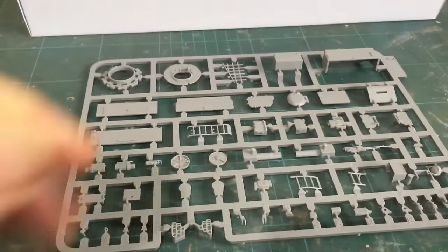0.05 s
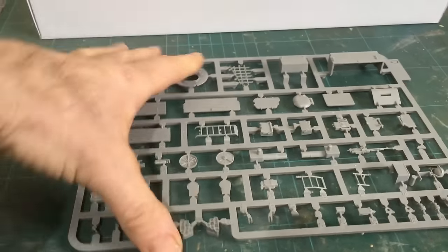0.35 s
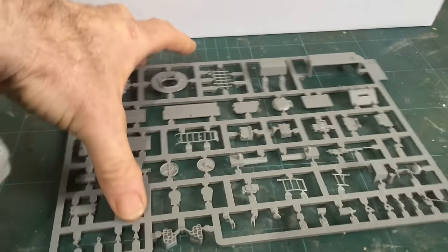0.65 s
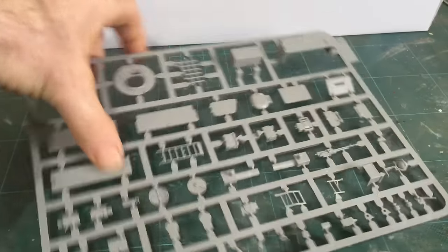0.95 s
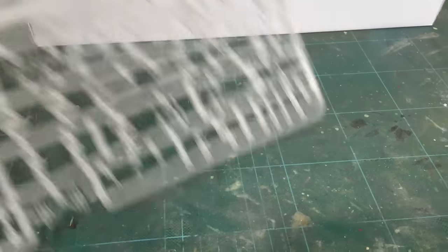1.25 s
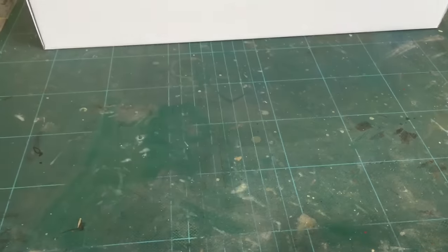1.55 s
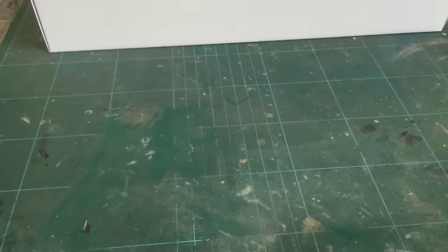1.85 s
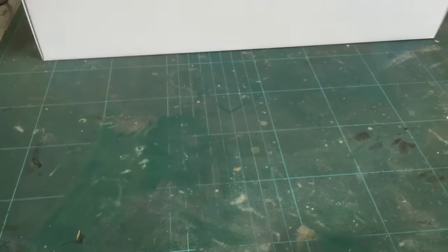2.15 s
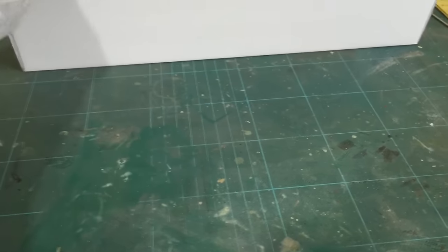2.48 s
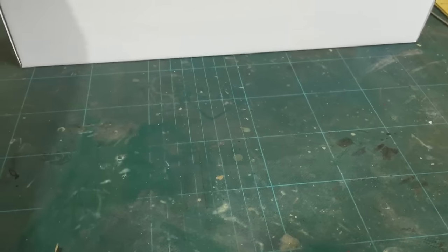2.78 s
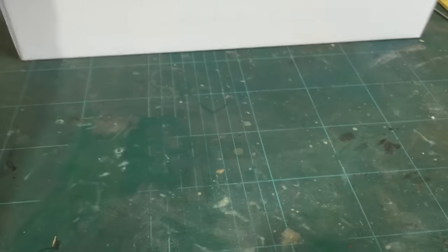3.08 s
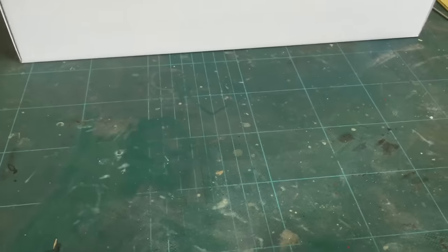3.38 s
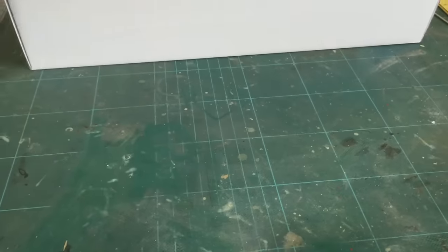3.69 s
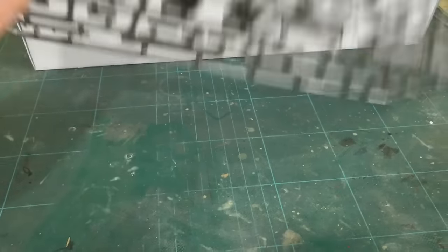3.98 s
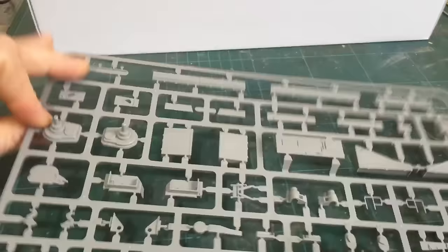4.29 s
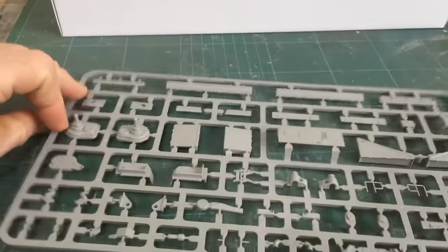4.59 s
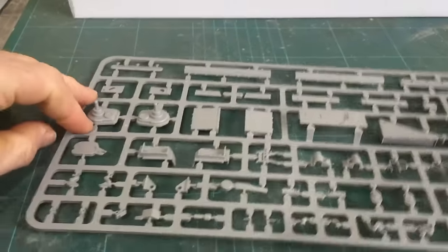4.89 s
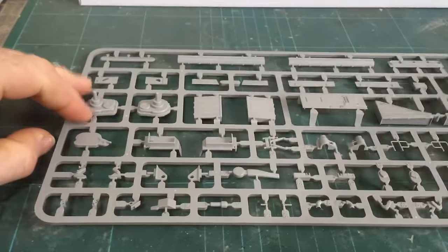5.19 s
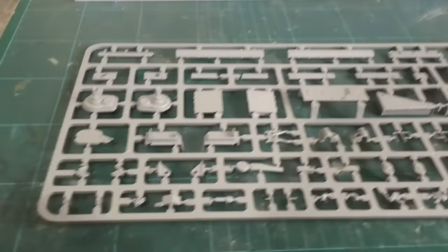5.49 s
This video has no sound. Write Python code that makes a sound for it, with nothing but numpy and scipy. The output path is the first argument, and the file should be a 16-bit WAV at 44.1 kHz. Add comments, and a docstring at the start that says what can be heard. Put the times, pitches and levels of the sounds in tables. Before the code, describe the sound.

Plastic model-kit frames are handled close by in a small room with short reverberation and faint steady room tone. From about 0.4 seconds one frame slides softly across a cutting mat in uneven pushes with a few ticks, and a sleeve brushes faintly near 1.3 seconds. From 1.8 to 2.5 seconds the frame is laid aside with a crackly rustle, light rattles and sharp, bright snaps. Between 2.6 and 3.6 seconds comes the loudest part: another frame scrapes out of a cardboard box in several pulls, with dull knocks and small snags. A few light clicks follow near 3.8 seconds. From 4.1 to 4.8 seconds the frame clatters down on the mat in a run of light plastic taps, one small part pinging briefly at 4.5 seconds. Short slides and a last soft tap nudge it straight, ending around 5.4 seconds.

```python
"""A cutting mat in a small room, where plastic model-kit sprues are swapped by hand.
One frame is dragged off the mat and laid aside with a rustle; the next is scraped out of its cardboard
box, clatters down on the mat and is nudged straight. Stick-slip friction excites plastic, cardboard and
a sleeve; impacts set the frames rattling and the box thudding; thin edges snap and small parts ring.
Diffuse reverberation follows each sound, over a steady room tone."""
import sys
import numpy as np
from scipy import signal
from scipy.fft import rfft, irfft
from scipy.io import wavfile

SR = 44100
rng = np.random.default_rng(int(sys.argv[2]) if len(sys.argv) > 2 else 0)


def digitize_waveform(pressure):
    """Quantize a signal to 16-bit integers and store it at the path in sys.argv[1].

    Rows of a 2-D input are taken as channels; values are limited to [-1, 1].
    """
    field = np.atleast_2d(pressure).T
    bounded = np.clip(field, -1, 1)
    quanta = np.round(bounded * 32767).astype(np.int16)
    wavfile.write(sys.argv[1], SR, quanta)


N = 244314
RING = 2 ** 14  # samples in an impulse response
T = np.arange(N) / SR
# normal modes of a plastic frame: f/Hz, bandwidth/Hz, lift/dB
FRAME_MODES = [(1069, 63, 4), (1040, 56, 0.5), (1152, 70, 2.5), (1330, 26, 3.5), (1580, 120, 1),
               (1860, 83, 1), (2240, 23, -5), (3010, 110, -1), (3290, 16, 0.5), (4220, 67, 5),
               (4800, 20, -9), (5320, 25, 5.5), (5750, 39, 7), (6500, 56, 5.5), (7260, 45, 1),
               (7000, 78, 3)]


def from_db(db):
    """Amplitude ratio of a level in decibels."""
    return 10 ** (np.asarray(db) / 20)


def unit_energy(x):
    """Energy normalisation: such a response leaves the power of white noise unchanged."""
    return x / np.sqrt(np.sum(x ** 2) + 1e-20)


def at_hz(points, hz):
    """Interpolation on a logarithmic frequency axis."""
    f, value = np.transpose(points)
    return np.interp(np.log(np.maximum(hz, 1)), np.log(f), value)


def band(x, low_hz, high_hz, order=4):
    """Causal band-pass filtering."""
    sections = signal.butter(order, [low_hz, min(high_hz, SR / 2 - 1)], "band", fs=SR, output="sos")
    return signal.sosfilt(sections, x + 1e-18)


def resonate(x, hz, width_hz):
    """Forced response of a damped oscillator with unit peak gain."""
    r = np.exp(-np.pi * width_hz / SR)
    feedback = [1, -2 * r * np.cos(2 * np.pi * hz / SR), r * r]
    return signal.lfilter(np.array([1, 0, -1]) * (1 - r * r) / 2, feedback, x + 1e-18)


def body(spectrum, modes=()):
    """Modal superposition: an impulse response made of a minimum-phase click and its resonances."""
    cepstrum = irfft(np.log(from_db(at_hz(spectrum, np.fft.rfftfreq(RING, 1 / SR)))))
    cepstrum[1:RING // 2] *= 2  # folding the cepstrum makes the click causal
    cepstrum[RING // 2 + 1:] = 0
    tap = irfft(np.exp(rfft(cepstrum)))
    return tap + sum((from_db(db) - 1) * resonate(tap, hz, width) for hz, width, db in modes)


def in_room(x, wet_db, build_s=0.0012):
    """Reverberation: direct sound, then a diffuse field that decays exponentially in each band."""
    # reverberation times: f/Hz, t60/s
    decay_times = [(150, 0.49), (550, 0.22), (1400, 0.18), (4000, 0.23), (14000, 0.14)]
    t, edges = T[:RING], np.geomspace(60, 18000, 9)
    tail = np.zeros(RING)
    for low, high in zip(edges, edges[1:]):
        t60 = at_hz(decay_times, np.sqrt(low * high))
        tail += band(rng.standard_normal(RING), low, high) * from_db(-60 * t / t60)
    diffuse = from_db(wet_db) * unit_energy(tail * (1 - np.exp(-t / build_s)))
    return signal.fftconvolve(x, unit_energy((t == 0) + diffuse))[:N]


def radiate(force, response, low_hz, high_hz):
    """Convolution of a force with one band of an impulse response, normalised to unit energy."""
    return signal.fftconvolve(force, unit_energy(band(response, low_hz, high_hz)))[:N]


def slips(per_s, spread_db, size=N):
    """Shot noise of rms 1: tiny random catches, mostly small, a few large."""
    sizes = from_db(spread_db * np.minimum(rng.exponential(1, size), 4)) * rng.choice([-1, 1], size)
    return unit_energy(sizes * (rng.random(size) < per_s / SR)) * np.sqrt(size)


def stroke_gains(strokes, speed_exponent=1.31, hiss_exponent=1.2):
    """Friction noise grows with sliding speed, hiss faster than body sound; strokes add in power."""
    body_power, hiss_power = np.zeros(N), np.zeros(N)
    for start, rise, hold, fade, body_db, hiss_db in strokes:
        slowing = from_db(-20 * np.clip((T - start - rise - hold) / fade, 0, 10))
        speed = np.clip((T - start) / rise, 0, 1) ** speed_exponent * slowing
        body_power += (from_db(body_db) * speed) ** 2
        hiss_power += (from_db(hiss_db) * speed ** hiss_exponent) ** 2
    return np.sqrt(body_power), np.sqrt(hiss_power)


def rub(gains, tap, per_s, spread_db, jerk_db, body_db, hiss_db, wet_db, jerks_per_s=90):
    """Stick-slip friction: a stream of slips under a wavering grip shakes a body and hisses."""
    body_gain, hiss_gain = gains
    grip = np.interp(T * jerks_per_s, np.arange(2000), rng.standard_normal(2000))
    force = unit_energy(slips(per_s, spread_db) * from_db(jerk_db * grip)) * np.sqrt(N)
    response = in_room(tap, wet_db)
    body_sound = radiate(force * body_gain * from_db(body_db), response, 70, 2000)
    hiss = radiate(force * hiss_gain * from_db(hiss_db), response, 2000, 18000)
    return body_sound + hiss


def room_tone(level_db=-66):
    """Stationary coloured noise: a low murmur with a faint hiss."""
    # background spectrum: f/Hz, relative level/dB
    spectrum = [(15, -60), (25, -35.5), (117, 3), (166, -8), (236, -0.5), (285, -8), (384, -4), (476, -8.5),
                (1400, -12.5), (2550, -12), (5730, -16), (10100, -17), (16000, -20.5)]
    noise = irfft(rfft(rng.standard_normal(N)) * from_db(at_hz(spectrum, np.fft.rfftfreq(N, 1 / SR))), N)
    return from_db(level_db) * unit_energy(noise) * np.sqrt(N)


def sleeve_brush():
    """Cloth friction: dense slips merge into broadband noise as the arm reaches in and swings away."""
    # arm swings: t/s, rise/s, hold/s, fade/s, relative body level/dB, relative hiss level/dB
    swings = [(0.2, 0.18, 0.032, 0.39, -70, -65.5), (1.3, 0.082, 0.018, 0.3, -68, -56)]
    # cloth spectrum: f/Hz, relative level/dB
    spectrum = [(60, -19), (130, -1), (300, 5.5), (600, -1), (3500, -5), (5000, -2), (7500, 2.5),
                (11000, -0.5), (16000, -4)]
    return rub(stroke_gains(swings), body(spectrum),
               per_s=15000, spread_db=5.0, jerk_db=1.5, body_db=1, hiss_db=-0.5, wet_db=-15)


def mat_slide():
    """Forced vibration: friction against the mat drives the modes of a frame."""
    # slides: t/s, rise/s, hold/s, fade/s, relative body level/dB, relative hiss level/dB
    slides = [(0.42, 0.056, .015, 0.26, -57.5, -61.5), (0.545, 0.039, 0.013, 0.4, -57, -60),
              (0.725, 0.026, .025, 0.25, -54.5, -60), (0.935, 0.0055, 0.034, 0.15, -55.5, -57),
              (1.0, 0.09, 0.026, 0.18, -52, -52.5), (1.2, 0.093, 0.011, 0.031, -54.5, -48),
              (4.54, .02, 0.017, 0.56, -58, -59.5), (4.75, 0.019, 0.011, 0.033, -54, -41.5),
              (4.81, 0.021, 0.03, 0.068, -48.5, -48.5), (5.06, 0.034, 0.0078, 0.21, -65.5, -66),
              (5.19, 0.095, 0.067, 0.1, -55.5, -55)]
    # spectrum of plastic on the mat: f/Hz, relative level/dB
    spectrum = [(41, -77), (70, -34), (124, -5), (286, -7.5), (336, -5), (566, -2), (779, -1.5), (1070, 3),
                (1200, -2), (2430, -16), (2660, -15.5), (3570, -18), (6160, -21.5), (13000, -20),
                (16000, -31.5)]
    return rub(stroke_gains(slides), body(spectrum, FRAME_MODES),
               per_s=7000, spread_db=2.0, jerk_db=3.5, body_db=-1.5, hiss_db=-2.5, wet_db=-8)


def edge_snaps(t60=0.014):
    """Sudden release of elastic energy: an edge springs free with a brief, bright crack."""
    # edges snapping past each other: t/s, dry peak level/dB, lower cutoff f/Hz
    snaps = [(0.4765, -45, 600), (1.0425, -45, 3200), (1.8425, -26.5, 5500), (1.9022, -36, 7000),
             (1.9497, -35, 10000), (2.026, -38, 9500), (2.0535, -37, 8500), (3.0372, -38, 5000),
             (3.3467, -30, 2500), (3.3615, -30, 8000), (4.1957, -38, 700), (4.2405, -37, 2000),
             (4.9408, -38, 3000)]
    out = np.zeros(N + RING)
    for start, peak_db, low_hz in snaps:
        burst = rng.standard_normal(RING) * from_db(-60 * T[:RING] / t60)
        crack = band(burst, low_hz, 15000, order=2)
        i = round(start * SR)
        out[i:i + RING] += from_db(peak_db) * crack / np.abs(crack).max()
    return in_room(out, wet_db=-8)


def frame_clatter(crack=0.58, hard_s=0.00098, reflection=0.26, parts_db=-0.25, gain_db=2):
    """Impact excitation: each contact is a crack, then a dying rattle of the frame's corners and parts."""
    # a frame lands or catches: t/s, rise/s, rattle t60/s, relative level/dB, brightness/dB
    contacts = [(0.477, 0.0016, 0.16, -62, -4.5), (1.773, 0.0017, 0.17, -58.5, 8.5),
                (1.841, .001, 0.21, -53.5, 10), (2.027, 0.0012, .17, -55.5, 8.5),
                (2.123, 0.00015, .13, -56.5, 0.5), (2.315, .001, 0.063, -63.5, 3),
                (3.038, .004, .06, -55, -3), (3.087, 0.0087, 0.076, -55.5, 1),
                (3.162, 0.0057, 0.21, -49, 5.5), (3.345, 0.0046, .05, -52, -1),
                (3.684, 0.0015, 0.034, -64.5, -1.5), (3.86, 0.0031, 0.11, -58, 2),
                (4.131, 0.014, 0.088, -51, 0), (4.196, 0.0018, 0.023, -56, -5),
                (4.24, 0.0024, 0.16, -56.5, 0.5), (4.274, 0.005, 0.068, -42.5, 1.5),
                (4.369, 0.0022, .1, -50.5, 0), (4.45, 0.0011, 0.073, -60, -1),
                (4.492, 0.0031, 0.086, -43.5, -0.5), (4.533, .009, 0.11, -54, 1),
                (4.707, 0.0023, 0.2, -47.5, 2.5), (4.743, 0, 0.17, -43.5, -3), (4.942, 0, 0.014, -57.5, -5),
                (5.194, 0.0045, 0.12, -53.5, -4)]
    # spectrum of a struck frame: f/Hz, relative level/dB
    spectrum = [(47, -18), (80, -12), (112, -8.5), (248, -4.5), (296, -9), (422, -3), (896, 0), (1050, 5),
                (2080, -13.5), (4230, -10), (6740, -15.5), (9610, -12.5), (10700, -13), (12300, -8.5),
                (16000, -19.5)]
    edges_hz = [90, 2000, 7000, 18000]  # three bands: frame, small parts, tick
    t, forces = T[:RING], np.zeros((3, N + RING))
    for start, rise, t60, db, bright_db in contacts:
        attack = np.minimum((t + 1 / SR) / (rise + 1 / SR), 1)
        decay = from_db(-60 * np.maximum(t - rise, 0) / t60)
        force = unit_energy(slips(per_s=5000, spread_db=3.0, size=RING) * attack * decay)
        force[0] += crack * np.exp(-rise / hard_s)  # a square hit cracks; a glancing one swells
        force += reflection * rng.choice([-1, 1]) * np.roll(force, rng.integers(5, 30))  # far-edge echo
        onset = int((0.025 + rise / 2) * SR)
        force /= np.sqrt(np.mean(force[:onset] ** 2))
        i = round(start * SR)
        forces[:, i:i + RING] += from_db([[db - bright_db], [db + parts_db], [db + bright_db]]) * force
    response = in_room(body(spectrum, FRAME_MODES), wet_db=-2)
    bands = zip(forces, edges_hz, edges_hz[1:])
    return from_db(gain_db) * sum(radiate(force, response, low, high) for force, low, high in bands)


def part_pings(overtone_ratio=2.34, overtone_db=-12, detune=0.06):
    """Free vibration: a flicked part rings in a cluster of close modes, with a weaker cluster above."""
    # parts flicked on their stalks: t/s, dry peak level/dB, f/Hz, t60/s
    flicks = [(0.719, -50.5, 2850, 0.016), (1.042, -37.5, 3750, 0.01), (3.842, -50.5, 3660, 0.019),
              (3.862, -38.5, 5550, 0.084), (3.864, -42.5, 3920, .09), (4.4923, -29.5, 5140, 0.056)]
    t, out = T[:RING], np.zeros(N + RING)
    for start, peak_db, hz, t60 in flicks:
        cluster_hz = hz * (1 + detune * (np.linspace(-1, 1, 5) + 0.2 * rng.standard_normal(5)))[:, None]
        phase = 2 * np.pi * (cluster_hz * t + rng.random(cluster_hz.shape))
        modes = np.sin(phase) + from_db(overtone_db) * np.sin(overtone_ratio * phase)
        ring = modes.sum(axis=0) * from_db(-60 * t / t60)
        i = round(start * SR)
        out[i:i + RING] += from_db(peak_db) * ring / np.abs(ring).max()
    return in_room(out, wet_db=-7)


def aside_rustle():
    """Sliding friction: a frame rustles and snags as it is laid aside."""
    # strokes: t/s, rise/s, hold/s, fade/s, relative body level/dB, relative hiss level/dB
    strokes = [(1.768, 0.031, 0.012, 0.16, -51.5, -52.5), (1.835, .01, .24, .13, -59, -52.5),
               (2.11, 0.024, 0.045, 0.094, -51.5, -55), (2.2, .03, 0.014, 0.096, -52, -52.5),
               (2.3, 0.022, 0.031, .1, -51, -59.5), (2.4, 0.019, 0.036, 0.16, -57.5, -66)]
    # rustle spectrum: f/Hz, relative level/dB
    spectrum = [(47, -58), (80, -21), (130, -1), (227, -4.5), (369, -2.5), (413, -4), (527, -6), (588, 1),
                (751, -5.5), (980, -1.5), (1860, -21), (12500, -24), (16000, -27)]
    gains = stroke_gains(strokes)
    rustle = rub(gains, body(spectrum),
                 per_s=5200, spread_db=3.5, jerk_db=3.0, body_db=1, hiss_db=-1.0, wet_db=-6.5)
    return rustle + snag_crackle(gains, per_s=340, gain_db=-5.5)


def snag_crackle(gains, per_s, gain_db):
    """Impulse-driven resonances: thin edges snag and snap free, each with a high pitch of its own."""
    _, hiss_gain = gains
    pitches = np.linspace(5500, 14000, 12)
    snags = sum(resonate(slips(per_s / len(pitches), spread_db=3.5), hz, width_hz=700) for hz in pitches)
    return in_room(unit_energy(snags) * np.sqrt(N) * from_db(gain_db) * hiss_gain, wet_db=-4)


def cardboard_knocks(unevenness=0.1):
    """Heavily damped resonance: a cardboard panel thuds as a frame bumps it or judders along it."""
    # knocks: t/s, dry peak level/dB, judder length/s, bounce rate/Hz, panel f/Hz
    knocks = [(1.7984, -37, .005, 800, 950), (2.176, -34, .012, 450, 650), (2.4277, -33, .014, 480, 600),
              (2.6984, -38, .001, 500, 600), (2.882, -25, .001, 500, 700), (2.956, -27, .007, 650, 850),
              (3.1805, -23.5, .016, 500, 550), (3.6186, -34, .001, 500, 1000), (3.843, -45, .009, 200, 220)]
    out = np.zeros(N + RING)
    for start, peak_db, length, per_s, hz in knocks:
        bounces = np.arange(1 + int(length * per_s))
        jitter = np.clip(unevenness * rng.standard_normal(len(bounces)), -0.5, 0.5) * (bounces > 0)
        times = (bounces + jitter) / per_s
        force = np.zeros(RING)
        force[(times * SR).astype(int)] = 1 - 0.3 * bounces / len(bounces)
        thud = band(resonate(force, hz, width_hz=450), 120, 1300)
        i = round(start * SR)
        out[i:i + RING] += from_db(peak_db) * thud / np.abs(thud).max()
    return in_room(out, wet_db=-10)


def box_scrape():
    """Forced vibration: the next frame scrapes along its box, driving the cardboard's modes, and snags."""
    # pulls: t/s, rise/s, hold/s, fade/s, relative body level/dB, relative hiss level/dB
    pulls = [(2.619, 0.15, 0.036, .1, -49.5, -61), (2.77, 0.074, 0.06, 0.22, -37, -49),
             (3.015, 0.027, .012, 0.1, -38.5, -50), (3.03, 0.14, 0.021, 0.2, -36, -42.5),
             (3.338, 0.026, 0.047, 0.22, -33.5, -42.5), (3.798, .04, 0.013, 0.088, -55, -69)]
    # spectrum of plastic on cardboard: f/Hz, relative level/dB
    spectrum = [(47, -66), (80, -24), (156, -9), (296, -11), (395, -1.5), (515, 2), (615, -6), (877, -3.5),
                (1170, -14), (1950, -23), (2080, -27), (2900, -28.5), (5050, -29.5), (12500, -32),
                (16000, -38)]
    # box resonances: f/Hz, bandwidth/Hz, lift/dB
    modes = [(162.5, 5.8, 2.2), (408, 16, 5.8), (522.7, 7.6, 7.4), (582, 11, 6.3), (668, 37, 7.7),
             (735, 13, 1.4), (869, 41, 9.3), (1060, 25, 5.6), (1265, 28, 4.5), (1896, 42, 5.9),
             (2950, 170, 9.6), (3480, 110, 7.4), (3800, 120, 7.4), (4250, 190, 7.6), (4500, 130, 5),
             (6360, 250, 5.2), (7640, 150, 8.9)]
    gains = stroke_gains(pulls)
    scrape = rub(gains, body(spectrum, modes),
                 per_s=4500, spread_db=3.0, jerk_db=1.5, body_db=0, hiss_db=-1.5, wet_db=-8)
    return scrape + snag_crackle(gains, per_s=870, gain_db=-13.5)


def scene():
    """Linear superposition of all sources in one channel."""
    return (room_tone() + sleeve_brush() + mat_slide() + edge_snaps() + frame_clatter() + part_pings()
            + aside_rustle() + cardboard_knocks() + box_scrape())[None]


def record(dry):
    """Band limiting: an elliptic low-pass cuts steeply above 15.9 kHz."""
    return signal.sosfilt(signal.ellip(10, 0.3, 70, 15900, fs=SR, output="sos"), dry)


dry = scene()
out = record(dry)
digitize_waveform(out)
```